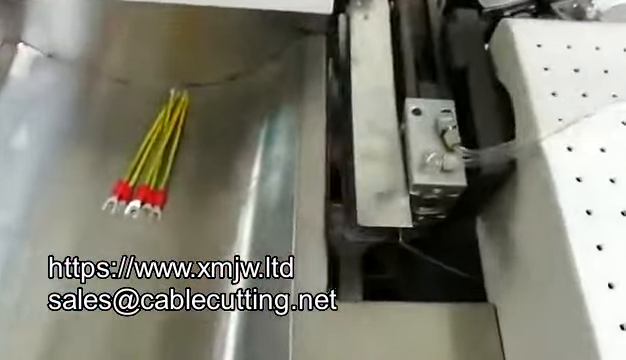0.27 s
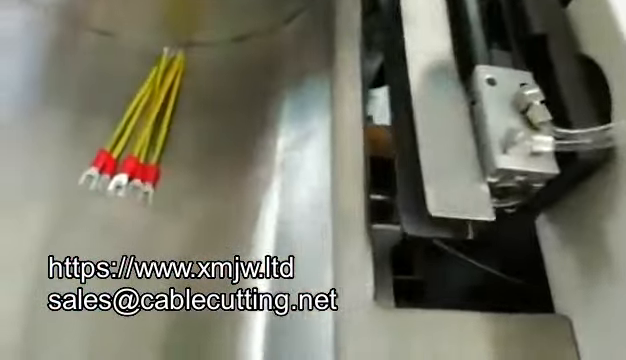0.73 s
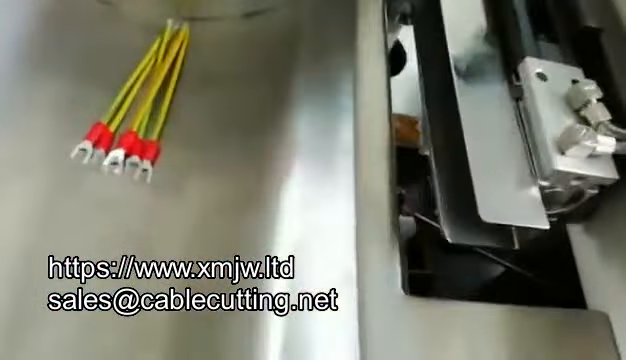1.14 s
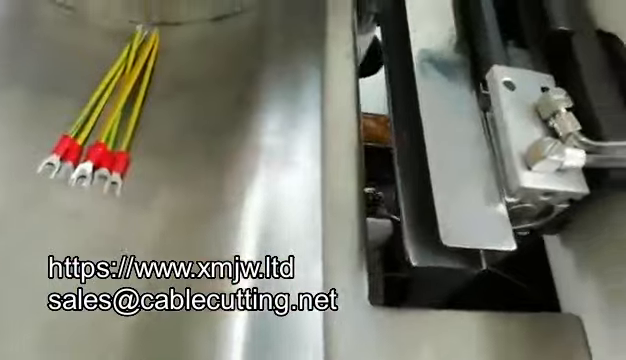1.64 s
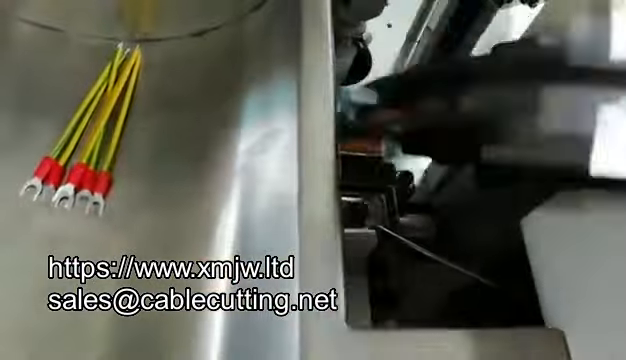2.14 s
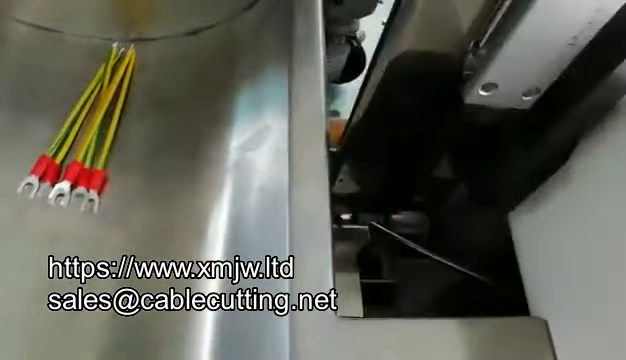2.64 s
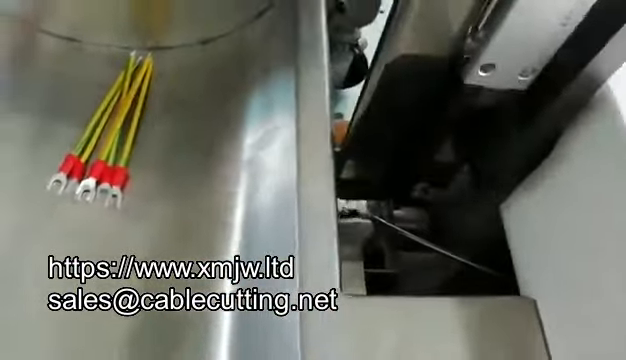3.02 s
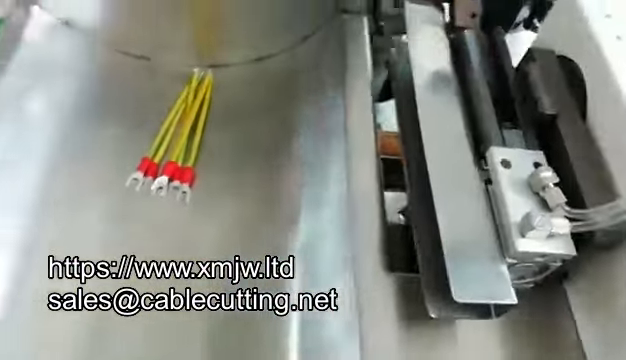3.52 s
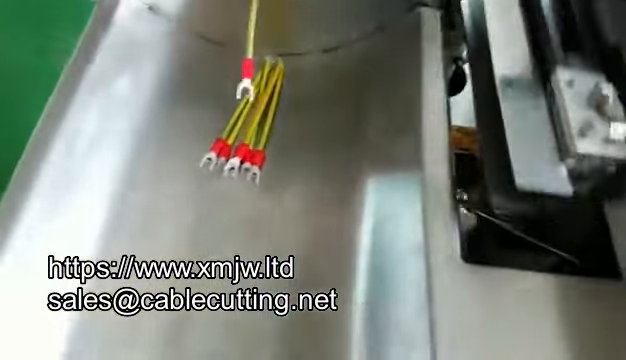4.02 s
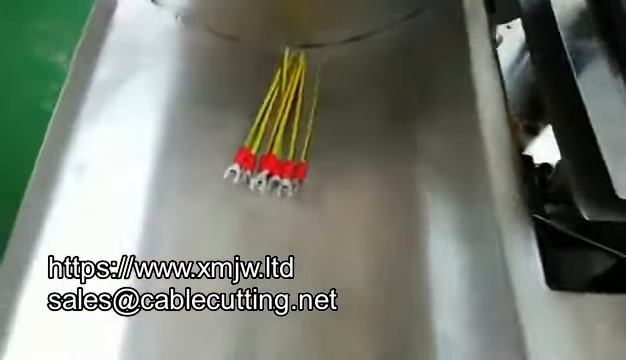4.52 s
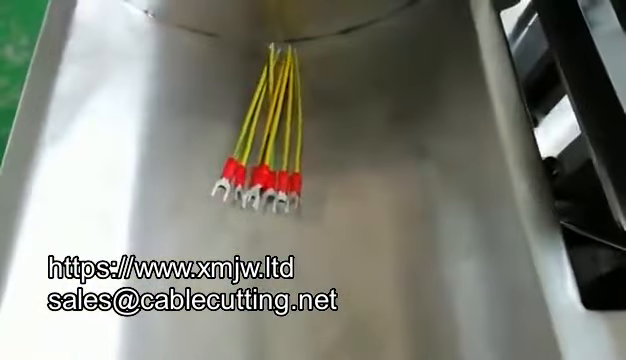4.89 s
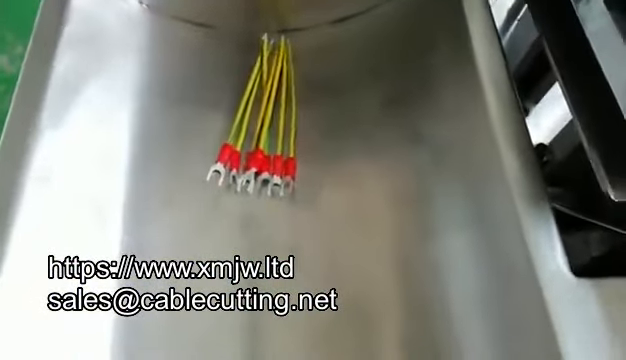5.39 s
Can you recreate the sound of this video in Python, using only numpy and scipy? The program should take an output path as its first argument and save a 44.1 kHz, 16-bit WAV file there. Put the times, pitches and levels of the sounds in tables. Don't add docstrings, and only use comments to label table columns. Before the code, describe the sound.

Over a dull wash of distant machinery and slight air leakage, a nearby wire crimper jolts, whines and clacks in quick irregular steps. Compressed air spits early, then blasts through a duct; after a calmer stretch of rattling, loud knocks bring another long hiss. A light, high tick marks the wire landing on a metal tray before the sequence repeats. Stereo phone pickup, slightly band-limited, with a short room echo.

```python
import sys
import numpy as np
from scipy import signal
from scipy.fft import rfft, irfft, next_fast_len
from scipy.io import wavfile
from scipy.ndimage import uniform_filter1d, minimum_filter1d, map_coordinates

SR = 44100
rng = np.random.default_rng(int(sys.argv[2]) if len(sys.argv) > 2 else 0)


def materialize(psi):
    bounded = np.clip(np.atleast_2d(psi).T, -1, 1)
    quanta = np.round(bounded * 32767).astype(np.int16)
    wavfile.write(sys.argv[1], SR, quanta)


def magnitude_from_level(level_db):
    exponent = np.asarray(level_db, float) / 20
    return 10 ** exponent


N = 249606
T = np.arange(N) / SR
CYCLE_S = 4.55


def unit(x):
    return x / np.sqrt(np.mean(x ** 2) + 1e-20)


def along(points, hz):
    f, v = np.transpose(points)
    return np.interp(np.log(hz + 1), np.log(f + 1), v)


def sides(pan_db):
    return magnitude_from_level(np.array([pan_db / 2, -pan_db / 2]))


def wobble(rate_hz):
    return map_coordinates(rng.standard_normal(int(N * rate_hz / SR) + 4), [T * rate_hz])


def filtered(x, response):
    m = next_fast_len(N + SR // 2)
    return irfft(rfft(x, m) * response(np.fft.rfftfreq(m, 1 / SR)), m)[..., :N]


def shape(points):
    return lambda hz: magnitude_from_level(along(points, hz))


def modes(rows):
    return lambda hz: np.sqrt(sum(magnitude_from_level(2 * db) / (1 + (2 * (hz - c) / w) ** 2) ** 2 for c, w, db in rows))


def again(rows):
    return rows + [(s + CYCLE_S, *rest) for s, *rest in rows if s + CYCLE_S < T[-1]]


def swells(start_s, length_s, db, pan_db, attack_s, fall_db_per_s, rest_db, rest_pan_db):
    t = T[::64]
    u = (t - start_s[:, None]) % CYCLE_S
    rise = np.clip(u / attack_s, 0, 1) ** 0.99
    each = magnitude_from_level(db[:, None] - fall_db_per_s * np.clip(u - length_s[:, None], 0, 1)) * rise
    rest = magnitude_from_level(rest_db) * sides(rest_pan_db)[:, None]
    power = sides(pan_db + 0 * db) ** 2 @ each ** 2 + rest ** 2
    return np.array([np.interp(T, t, np.sqrt(side)) for side in power])


# (frequency [Hz], likeness [0..1])
ALIKE = [(120, 1), (240, 1), (490, 0.51), (1500, 0.44), (3500, 0.34), (8000, 0.19)]
# (frequency [Hz], lead [rad])
LEAD = [(0, 3), (340, -0.84), (600, 4), (1210, 0.4), (1550, -8.5), (1810, 1), (2240, 2.5), (2930, 15),
        (3190, 12), (3790, 14), (4820, 7.5), (5770, 12), (6800, 1.5), (8180, 4.5)]


def rush(gain, patchy_db):
    z = signal.stft(rng.standard_normal((2, N)), nperseg=2048)[2]
    patches = uniform_filter1d(rng.standard_normal(z.shape), size=3, axis=1)
    patches = uniform_filter1d(patches, size=4, axis=2)
    pair = signal.istft(z * magnitude_from_level(patchy_db * unit(patches)), nperseg=2048)[1][:, :N]

    def paths(hz):
        alike = np.clip(along(ALIKE, hz), 0, 1)
        lead = along(LEAD, hz) * np.clip(hz / 130 - .7, 0, 1)
        return gain(hz) * np.array([hz * 0 + 1, alike * np.exp(-1j * lead), np.sqrt(1 - alike ** 2)])

    left, shared, own = filtered(pair[[0, 0, 1]], paths)
    return unit(np.array([left, shared + own]))


# (frequency [Hz], density [dB per Hz])
HALL = [(13, -41.5), (22, -4), (55, -1.5), (114, -4.5), (181, 9), (351, -4), (632, -7.5), (1030, -13.5),
        (1570, -9), (1730, -17.5), (2430, -25.5), (4950, -35.5), (7150, -17), (7700, -44.5), (10000, -56.5),
        (16900, -120)]
# (frequency [Hz], level [dB rms])
HUM = [(174.6, -46.5), (349.5, -46)]
# (frequency [Hz], level [dB rms], stop time [s])
FAR_MOTOR = (517, -45, 0.4)


def hall():
    hum = 0
    for hz, db in HUM:
        hum = hum + magnitude_from_level(db - 3.5 + 1.5 * wobble(8.5)) * np.sin(2 * np.pi * hz * T + 2.4 * wobble(12))
    wash = magnitude_from_level(-40 + wobble(5.1)) * rush(shape(HALL), patchy_db=5.5)
    hz, db, stop_s = FAR_MOTOR
    motor = magnitude_from_level(db - 1.5 + 3.6 * wobble(11)) * np.sin(2 * np.pi * hz * T)
    motor = motor * np.clip((stop_s - T) / 0.094, 0, 1)
    return wash + hum + motor * sides(3.8)[:, None]


# (frequency [Hz], width [Hz], level [dB])
FRAME = [(760, 100, -3), (830, 31, 2), (910, 93, -2), (1030, 37, -0.5), (1179, 230, -6.5)]
COVERS = [(1440, 820, 18), (1470, 360, 7), (1827, 49, -22.5)]
BASE = [(90.5, 31, -7), (194, 65, 1.5), (315.5, 103, 0.5), (511, 230, -0.5)]
# (start [s], length [s], frame [dB], covers [dB], left-right [dB])
STROKES = [(0.085, 0.3, -45, -42.5, 3), (0.339, 0.084, -33.5, -55, 2), (0.432, 0.13, -36.5, -52, 3),
           (0.512, 0.066, -33.5, -56, -2.5), (0.573, 0.059, -34, -35.5, 4), (0.659, 0.2, -29.5, -32, 8.5),
           (0.887, 0.12, -25, -38.5, 0), (0.983, 0.088, -31.5, -36.5, 8.5), (1.09, 0.1, -25, -39.5, 2),
           (1.217, 0.46, -32.5, -27.5, 3), (1.672, 0.4, -28, -33.5, 8.5), (1.969, .4, -26.5, -31, 6),
           (2.375, 0.18, -26, -37.5, 3.5), (2.745, 0.12, -31, -46.5, 6.5), (2.964, 0.075, -30, -38.5, 1.5),
           (3.035, 0.16, -25.5, -31.5, 4), (3.204, 0.024, -25, -27, 10.5), (3.265, 0.49, -40, -41.5, 4),
           (3.704, .25, -29.5, -35, 1.5), (3.956, 0.069, -30.5, -37.5, -2.5),
           (4.034, 0.17, -25.5, -42.5, 2), (4.246, 0.13, -34.5, -62.5, 3.5), (4.37, 0.16, -30, -31, 2),
           (4.547, 0.061, -34.5, -47, -0.5)]
# (start [s], length [s], level [dB])
LOADS = [(0.569, 0.5, -35.5), (0.721, 0.11, -27), (0.9, 0.14, -33.5), (1.086, 0.18, -27.5), (1.285, 1, -30),
         (1.847, 0.25, -30.5), (2.053, 0.33, -22), (2.37, 0.14, -27), (2.778, 0.3, -40), (3.13, 0.064, -26),
         (3.614, 0.38, -31), (4.048, 0.096, -23.5), (4.157, 0.086, -34.5), (4.267, 0.46, -41)]


def machine_body():
    start_s, length_s, frame_db, covers_db, pan_db = np.transpose(STROKES)

    def stroke(db):
        return swells(start_s, length_s, db, pan_db, attack_s=0.015, fall_db_per_s=343,
                      rest_db=-65, rest_pan_db=4)

    load = swells(*np.transpose(LOADS), pan_db=0, attack_s=0.038, fall_db_per_s=201.5,
                  rest_db=-41.5, rest_pan_db=0)
    lumps = wobble(40)
    frame = unit(magnitude_from_level(2.3 * lumps) * rush(modes(FRAME), patchy_db=3.5))
    covers = unit(magnitude_from_level(1.5 * lumps + 2 * wobble(70)) * rush(modes(COVERS), patchy_db=4))
    base = unit(magnitude_from_level(2 * wobble(30)) * rush(modes(BASE), patchy_db=4))
    return stroke(frame_db - 1) * frame + stroke(covers_db + 1) * covers + load * magnitude_from_level(-4) * base


# (frequency [Hz], density [dB per Hz])
NOZZLE = [(3120, -17.5), (5300, -4), (6340, -3.5), (7210, 7), (7700, 0), (10000, -34.5), (16900, -120)]
# (frequency [Hz], width [Hz], level [dB])
BLOW_DUCT = [(1680, 320, -2.5), (1827, 150, -1.5), (2134, 74, -1.5), (2430, 40, -1), (2680, 360, -4.5),
             (3252, 130, -1.5), (3530, 120, -4.5), (3880, 450, 0.5), (4630, 150, -8.5), (4540, 610, -4.5),
             (5200, 1200, -10)]
# (frequency [Hz], density [dB per Hz])
VENT_DUCT = [(1120, -32.5), (1900, -1), (2350, -1.5), (2990, 1), (3610, -1), (5230, -3), (5600, -2.5),
             (7280, -6), (12300, -120)]
# (start [s], end [s])
BLOW_SPAN = (1.2, 1.7)
# (start [s], length [s], nozzle [dB], duct [dB], left-right [dB])
VENTS = [(0.361, 0.19, -49, -43, -8), (0.555, 0.042, -27, -24, -6.5), (0.667, 0.18, -45, -33.5, -5.5),
         (0.878, .2, -57, -42, -10), (1.134, 0.039, -56, -34, -5), (1.21, 0.027, -32, -37.5, -7.5),
         (1.225, 0.43, -22, -16, -5.5), (1.654, 0.13, -31.5, -30.5, -15), (1.77, 0.12, -39.5, -25.5, -11),
         (1.882, .43, -43.5, -34.5, 0.5), (2.356, 0.061, -35.5, -29.5, -3.5),
         (2.457, 0.071, -44.5, -40, -8), (2.772, 0.036, -56, -44.5, 2.5), (3.029, 0.15, -47, -38, -6.5),
         (3.092, 0.084, -40.5, -36.5, -7), (3.152, 0.462, -22, -26, -6),
         (3.188, 0.025, -26.5, -20.5, -14.5), (3.623, .16, -28, -29.5, -11),
         (3.781, 0.029, -22, -32.5, -11.5), (3.808, 0.061, -31, -28.5, -13.5),
         (3.86, 0.029, -16.5, -26.5, -6), (3.935, 0.084, -35, -30.5, -11.5), (4.039, 0.09, -35, -30.5, -7),
         (4.144, 0.24, -47, -43.5, -6.5), (4.4, 0.15, -48, -42.5, -9)]
# (nozzle [dB], duct [dB], left-right [dB])
LEAK = (-52.5, -48, -14.5)


def air():
    start_s, length_s, nozzle_db, duct_db, pan_db = np.transpose(VENTS)
    leak_nozzle_db, leak_duct_db, leak_pan_db = LEAK

    def flow(db, rest_db, wide):
        return swells(start_s, length_s, db, wide * pan_db, attack_s=0.03, fall_db_per_s=238.5,
                      rest_db=rest_db, rest_pan_db=wide * leak_pan_db)

    blowing = uniform_filter1d(1. * (T > BLOW_SPAN[0]) * (T < BLOW_SPAN[1]), size=900)
    duct = blowing * rush(modes(BLOW_DUCT), patchy_db=3.5)
    duct += (1 - blowing) * rush(shape(VENT_DUCT), patchy_db=4)
    nozzle = unit(magnitude_from_level(1.5 * wobble(260)) * rush(shape(NOZZLE), patchy_db=3.5))
    hiss = flow(nozzle_db + 2.5, leak_nozzle_db, wide=1) * nozzle
    return hiss + flow(duct_db - 2, leak_duct_db, wide=0.23) * duct


# (time [s], peak [dB], panel [Hz], left-right [dB], t60 [s])
JOLTS = [(0.023, -22, 930, 3, 0.098), (0.351, -21.5, 926, 0.5, 0.081), (0.372, -16.5, 912, 3, 0.087),
         (0.512, -28, 1050, 6, 0.07), (0.533, -16.5, 911, -2, 0.094), (0.666, -21, 1206, 6, 0.08),
         (0.684, -19.5, 1230, -1, 0.071), (0.809, -16, 1326, 9, 0.053), (0.82, -21, 1210, 6.5, 0.055),
         (0.845, -14, 1220, 7, 0.041), (0.906, -20, 900, 4, 0.063), (0.954, -21.5, 910, 8, 0.11),
         (1.043, -15, 1243, 8, 0.07), (1.123, -21, 940, -4, 0.09), (1.134, -15.5, 1028, 2.5, 0.12),
         (1.164, -12.5, 825, 2.5, 0.092), (1.681, -17.5, 855, -1.5, 0.051), (2.143, -12.5, 878, 0, 0.11),
         (2.176, -14, 889, 2.5, 0.08), (2.37, -18, 900, 5, 0.11), (2.251, -18, 837, 3.5, 0.096),
         (2.413, -16.5, 1175, 4, 0.086), (2.796, -27, 1600, -1, 0.13), (2.815, -23.5, 1485, 2.5, 0.15),
         (2.772, -23, 818, -7, 0.12), (2.829, -18, 826, -2, 0.16), (3.055, -17.5, 1026, 4, 0.095),
         (3.1, -15.5, 831, -4, 0.13), (3.156, -21, 1154, -1, 0.1), (3.215, -12.5, 1100, 3, 0.07),
         (3.215, -16.5, 1486, 0, 0.028), (3.885, -22, 1040, 5, 0.21),
         (4.063, -23.5, 993, 3, 0.09), (4.187, -14.5, 1180, 1, 0.043), (4.278, -26, 1045, 4, 0.12),
              (4.33, -28.5, 995, -11, 0.1), (4.6, -23.5, 907, 1, 0.051), (4.412, -22, 850, 16, 0.07),
              (4.453, -23, 976, 4, 0.086), (4.491, -16, 1512, -7, 0.056), (4.879, -23, 1176, 3, 0.073),
              (4.916, -14.5, 971, 8.5, 0.038), (5.056, -21.5, 944, 11, 0.092),
              (5.235, -17.5, 1223, -8, 0.098), (5.351, -18, 841, 9, 0.075), (5.382, -14, 1240, 1.5, 0.072),
              (5.452, -18, 980, 2, 0.04), (5.384, -17.5, 785, 0, 0.06), (5.507, -16.5, 964, 8, 0.058),
              (5.59, -17, 1225, -0.5, 0.06)]


def jolts():
    out, t = np.zeros((2, N + SR)), np.arange(SR // 5) / SR
    lag = np.array([[0], [1.04]])
    for s, db, hz, pan_db, t60_s in JOLTS:
        panel = np.sin(2 * np.pi * hz * t - lag)
        detunes = 1 + .08 * rng.standard_normal(2)
        neighbours = sum(np.sin(2 * np.pi * hz * detune * t + lag) for detune in detunes)
        swell = (1 - np.exp(-t / 0.0024)) * magnitude_from_level(db - 2 - 60 * t / max(t60_s, .02))
        out[:, round(s * SR):][:, :len(t)] += sides(pan_db)[:, None] * swell * (panel + 0.31 * neighbours)
    return out[:, :N]


def axis(moves, orders, hz_per_s, rough, fade, boom_db):
    guard_db, guard_hz = 6, 130
    airborne, shaking = np.zeros((2, 2, N))
    for s, cruise_s, hz, db, pan_db in again(moves):
        ramp_s = hz / hz_per_s
        move_s = 2 * ramp_s + cruise_s
        at = slice(round(s * SR), round((s + move_s) * SR))
        u = T[at] - s
        speed = np.sin(np.pi / 2 * np.clip(np.minimum(u, move_s - u) / ramp_s, 0, 1)) ** 1.3
        for k, order_db, grow in orders:
            turn = 2 * np.pi * np.cumsum(k * hz * speed) / SR
            belt = 1 - rough + rough * (wobble(200) + 1j * wobble(200))[at]
            for c in range(2):
                guards = -guard_db * np.abs(rng.standard_normal(60))
                guards[0] = 0
                passed_db = np.interp(k * hz * (1 - speed) / guard_hz, np.arange(60), guards)
                swing_db = passed_db + grow * (u - u.mean()) + 2.5 * wobble(30)[at]
                phase = turn + .9 * c * (1 + 0 * u)
                tone = magnitude_from_level(db + order_db + 4 + swing_db) * np.imag(belt * np.exp(1j * phase))
                airborne[c, at] += sides(pan_db)[c] * speed ** fade * tone
                shaking[c, at] += tone
    return airborne + magnitude_from_level(boom_db) * filtered(shaking, modes(FRAME))


# (start [s], cruise [s], cruise whine [Hz], level [dB], left-right [dB])
FEED = [(.084, .02, 2770, -36, -3), (2.975, .02, 2850, -44, 0)]
RETRACT = [(.338, .035, 3090, -41, 0), (4.378, .018, 3110, -35, 0)]
STRIP = [(.643, .058, 3700, -30.5, -4), (1.75, .08, 3710, -41, 0)]
NUDGE = [(.89, .02, 1720, -31, 3), (.985, .03, 1720, -33, 3), (2.757, .008, 1680, -27, 4),
         (3.066, .004, 2430, -33.5, 0), (3.76, .17, 2050, -41, 0)]
GANTRY = [(1.96, .2, 2477, -39, -3), (4.195, .045, 2110, -38, 0)]
# (multiple of whine [1], level [dB], growth through move [dB/s])
FEED_ORDERS = [(.49, 4, 0), (.85, -14, 80), (1, 0, -30)]
RETRACT_ORDERS = [(.5, 1, 0), (.92, -9, 0), (1, -1, 0)]
STRIP_ORDERS = [(.25, -8, 0), (.33, -7, 0), (.475, -12, 0), (.66, -12, 0), (.8, -15, 0), (.92, -11, 0),
                (1, 0, 0)]
NUDGE_ORDERS = [(.5, -7, 0), (.7, -8, 0), (1, 0, -110)]
GANTRY_ORDERS = [(.14, -1, 0), (.5, -8, 0), (1, 0, 35), (2, -10, -30)]


def servos():
    whine = axis(FEED, FEED_ORDERS, hz_per_s=28000, rough=.3, fade=3, boom_db=-12)
    whine += axis(RETRACT, RETRACT_ORDERS, hz_per_s=31000, rough=.4, fade=4, boom_db=2)
    whine += axis(STRIP, STRIP_ORDERS, hz_per_s=49000, rough=.36, fade=2, boom_db=-4)
    whine += axis(NUDGE, NUDGE_ORDERS, hz_per_s=41000, rough=.35, fade=1.2, boom_db=-8)
    whine += axis(GANTRY, GANTRY_ORDERS, hz_per_s=20600, rough=.18, fade=6, boom_db=-14)
    return whine


# (frequency [Hz], t60 [s])
STEEL = [(340, 0.044), (1100, 0.031), (1500, 0.017), (2300, 0.033), (3050, 0.02), (4200, 0.018),
         (4900, 0.021)]


def knocks(rows, spit_db):
    out, t = np.zeros((2, N + SR)), np.arange(SR // 10) / SR
    rise = 1 - np.exp(-t / 0.00086)
    for s, db, thud_db, pan_db in again(rows):
        ring = np.zeros((2, len(t)))
        for hz, t60_s in STEEL:
            partial_db = 1.7 * rng.standard_normal((2, 1)) + (thud_db if hz < 2000 else -6)
            ring += magnitude_from_level(partial_db - 60 * t / t60_s) * np.sin(2 * np.pi * hz * t)
        puff = magnitude_from_level(spit_db - 60 * t / .03) * np.diff(rng.standard_normal((2, len(t) + 2)), 2) / 2
        hit = magnitude_from_level(db - 17.5) * rise * (ring + puff)
        out[:, round(s * SR):][:, :len(t)] += sides(pan_db)[:, None] * hit
    return out[:, :N]


# (time [s], peak [dB], thud [dB], left-right [dB])
STOPS = [(.165, -18, -18, -9.5), (.33, -27, 11, -4), (.368, -32, -6, 3.5), (.685, -6, -13, -10.5),
         (.77, -19, 13, 2.5), (.829, -6.5, -10.5, 5), (.904, -21.5, 9, -2.5), (1.158, -13, -20, -5.5),
         (2.398, -16, 1.5, 3.5), (2.772, -20, -5.5, -4.5), (3.053, -22.5, -4, 9), (3.216, 4, -11.5, 4),
         (3.219, 0.5, -10, -0.5), (3.224, 4, -12, -1.5), (4.062, -12.5, 0, -5), (4.089, -20, -2, 7),
         (4.413, -25, 13, 5), (4.489, -25, -5, 1)]


def slide_stops():
    return knocks(STOPS, spit_db=-29)


# (time [s], peak [dB], frequency [Hz])
THUMPS = [(0.249, -44, 140), (0.552, -37.5, 121), (0.92, -46, 118), (1.228, -39.5, 132), (1.559, -45, 67.3),
          (1.641, -32.5, 110), (1.722, -35, 99.6), (1.858, -28, 78.1), (2.328, -37, 132), (2.594, -37, 102),
          (2.681, -44, 88.8), (2.97, -47, 51.1), (3.169, -42, 140), (3.17, -32, 118), (3.495, -47, 72.7),
          (3.606, -33, 97), (3.98, -37, 72.7), (4.155, -31, 115), (4.278, -40, 94.2), (4.408, -42, 86.1),
          (4.524, -44, 116), (4.795, -49, 140), (4.947, -39.5, 140), (5.101, -31.5, 126), (5.179, -32, 105),
          (5.376, -44, 121)]


def thumps():
    out, t = np.zeros(N + SR), np.arange(SR // 4) / SR
    for s, db, hz in THUMPS:
        swell = (1 - np.exp(-t / 0.0083)) * magnitude_from_level(db + 4 - 60 * t / .15)
        out[round(s * SR):][:len(t)] += swell * np.sin(2 * np.pi * hz * t)
    return out[:N]


# (time [s], peak [dB], thud [dB], left-right [dB])
SPOOLS = [(.567, -28, -10, -1.5), (.582, -1.5, -16, -6.5), (.598, 2.5, -28.5, 3), (1.227, -12, -11.5, 0),
          (1.246, 3, -10, -0.5), (1.659, -10, 2.5, -9), (3.198, -22.5, -7.5, 0.5), (3.228, -15.5, -2, 1.5),
          (3.366, -3, -16.5, -4.5), (3.729, -1.5, -5, -3), (3.8, -17.5, 5, -9), (3.893, -19, -19, -6.5),
          (4.076, -8, -13, 7), (4.131, -14.5, 2.5, -1.5)]


def valve_spools():
    return knocks(SPOOLS, spit_db=-11.5)


# (start [s], length [s], frequency [Hz], level [dB])
WHISTLES = [(3.42, 0.11, 1810, -31.5), (3.26, 0.41, 1800, -40), (3.41, 0.31, 345, -39.5),
            (3.36, .08, 7100, -35.5)]


def whistles():
    out = np.zeros((2, N))
    for s, length_s, hz, db in WHISTLES:
        swell = np.sin(np.pi * np.clip((T - s) / length_s, 0, 1)) ** .5
        for side in out:
            waver = wobble(90) + 1j * wobble(68)
            side += magnitude_from_level(db) * swell * np.imag(waver * np.exp(2j * np.pi * hz * T))
    return out


# (time [s], peak [dB], left-right [dB])
TICKS = [
    (3.801, -44.5, -5.5),
    (4.134, -20.5, 7.5),
    (4.237, -22, -2.5),
    (4.25, -1.5, -6.5),
    (4.265, -28, -2),
]
# (frequency [Hz], level [dB])
TRAY = [(5500, -16.5), (6600, -12.5), (7500, -2.5), (8000, 0), (8400, -10)]


def wire():
    out, t = np.zeros((2, N + SR)), np.arange(SR // 20) / SR
    peak_s = .005
    swell = np.exp(-.5 * ((t - peak_s) / 0.0012) ** 2) + .12 * magnitude_from_level(-60 * np.abs(t - peak_s) / 0.037)
    touch = magnitude_from_level(-22) * np.exp(-.5 * ((t - .002) / .001) ** 2)
    for s, db, pan_db in TICKS:
        ring = np.zeros((2, len(t)))
        for hz, level_db in TRAY:
            ring += magnitude_from_level(level_db) * np.sin(2 * np.pi * hz * t + rng.uniform(0, 1, (2, 1)))
        noise = np.pad(rng.standard_normal(len(t)), (0, N - len(t)))
        scrape = filtered(noise, lambda hz: (hz > 7000) * (hz < 12000))[:len(t)]
        contact = magnitude_from_level(db) * touch * scrape
        tick = magnitude_from_level(db - 14) * (swell * ring + contact)
        out[:, round((s - peak_s) * SR):][:, :len(t)] += sides(pan_db)[:, None] * tick
    return out[:, :N]


# (time [s], peak [dB], thud [dB], left-right [dB])
RATTLE = [(4.032, -17.5, -3.5, 0), (4.062, -18.5, -0.5, 0.5), (4.074, -13.5, -1, 4.5),
          (4.137, -18, -3, 2.0), (4.187, -18, 1, 2.5), (4.22, -24, 0, -2.0)]


def gripper():
    return knocks(RATTLE, spit_db=-29)


# (frequency [Hz], t60 [s])
ROOM = [(200, 0.068), (2000, 0.53), (8000, 0.021)]


def room(x):
    hz, t, z = signal.stft(rng.standard_normal((2, SR // 2)), SR, nperseg=256)
    tail = signal.istft(z * magnitude_from_level(-60 * t / along(ROOM, hz)[:, None]), SR, nperseg=256)[1]
    return signal.fftconvolve(x, tail / np.linalg.norm(tail[0]), axes=1)[:, :N]


def ducked(background, jets):
    depth_db, knee_db = -13, -17.5
    loud = np.abs(uniform_filter1d(np.mean(jets ** 2, axis=0), size=3000))
    return magnitude_from_level(depth_db * loud / (loud + magnitude_from_level(2 * knee_db))) * background


def scene():
    jets = air() + whistles()
    whine = servos()
    near = jolts() + slide_stops() + valve_spools() + gripper()
    machine = ducked(hall(), jets) + machine_body() + jets + near + whine + thumps()
    machine += magnitude_from_level(-6.5) * room(near) + magnitude_from_level(-13) * room(whine)
    return filtered(machine, lambda hz: hz < 7560) + wire()


def dropouts(x):
    hz, t, z = signal.stft(x, SR, nperseg=1024)
    seeds = rng.random((len(hz), len(t))) < .0025
    kept = minimum_filter1d(1. - seeds, size=4, axis=0)
    kept = minimum_filter1d(kept, size=5, axis=1)
    empty = (kept < 1) * (hz[:, None] > 400) * (hz[:, None] < 6800)
    return signal.istft(z * magnitude_from_level(-20 * empty), SR, nperseg=1024)[1][:, :N]


def roll_off(x):
    return signal.sosfilt(signal.butter(12, 12200, fs=SR, output="sos"), x)


def record(dry):
    wide = filtered(dry[0] - dry[1], lambda hz: .55 + .45 / np.sqrt(1 + (190 / (hz + 1)) ** 4))
    mid = dry.mean(axis=0)
    mix = dropouts(np.array([mid + wide / 2, mid - wide / 2]))
    return roll_off(mix)


dry = scene()
out = record(dry)
materialize(out)
```